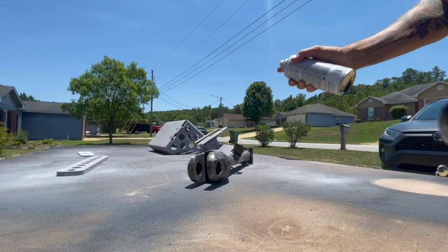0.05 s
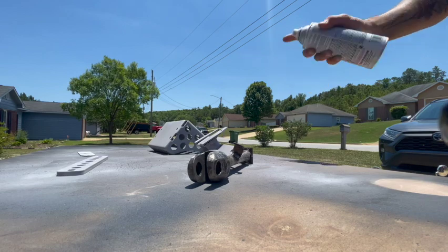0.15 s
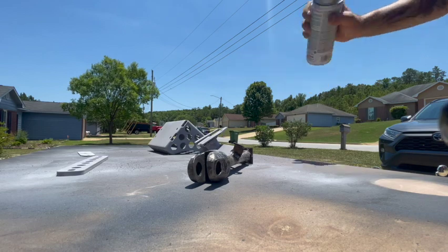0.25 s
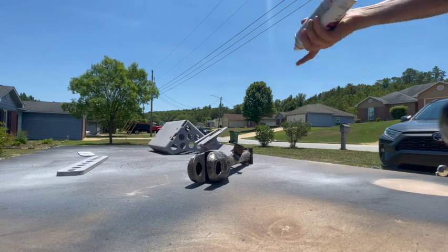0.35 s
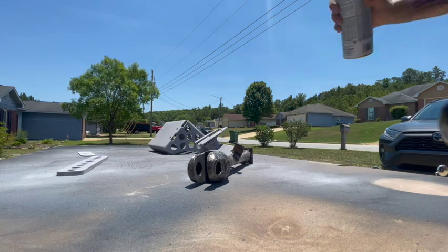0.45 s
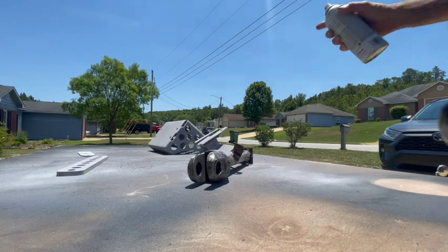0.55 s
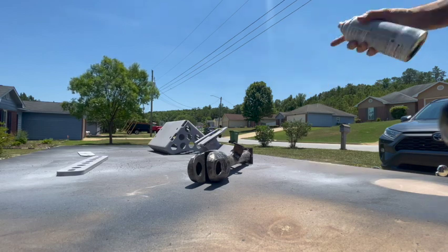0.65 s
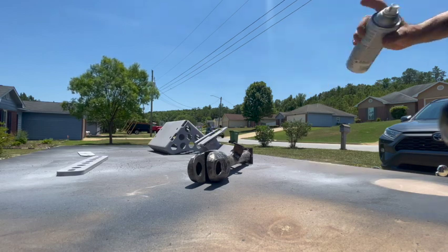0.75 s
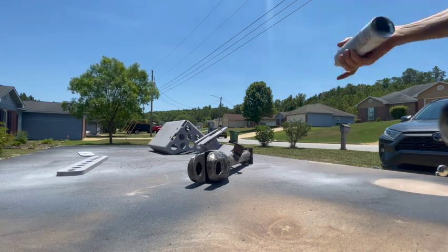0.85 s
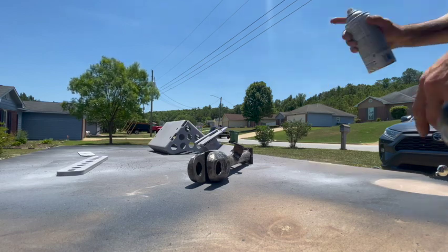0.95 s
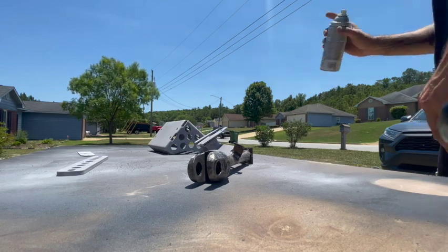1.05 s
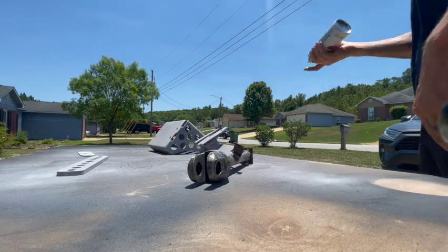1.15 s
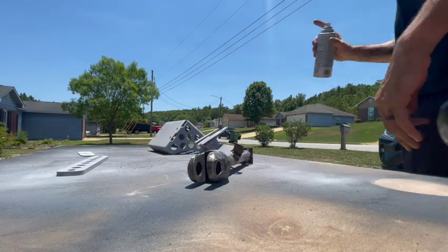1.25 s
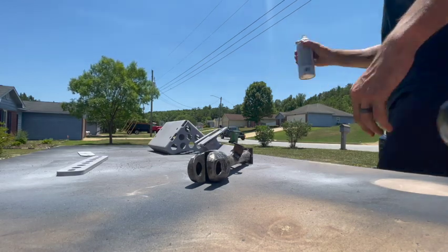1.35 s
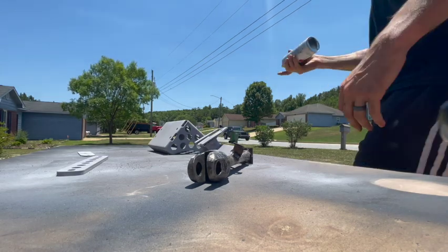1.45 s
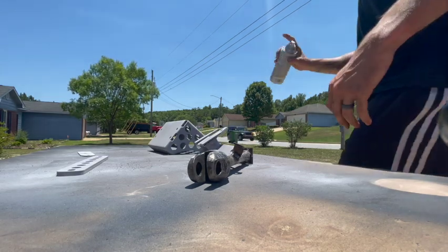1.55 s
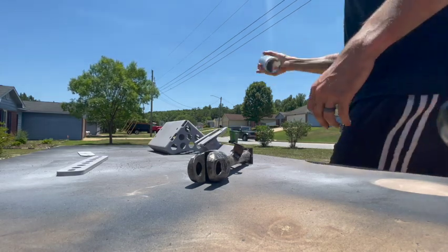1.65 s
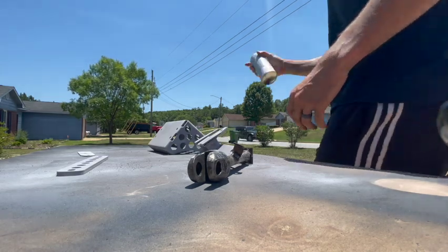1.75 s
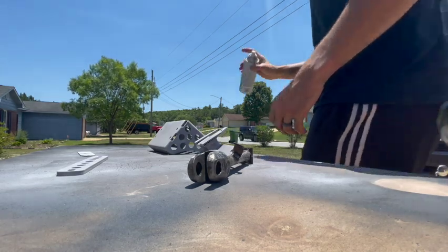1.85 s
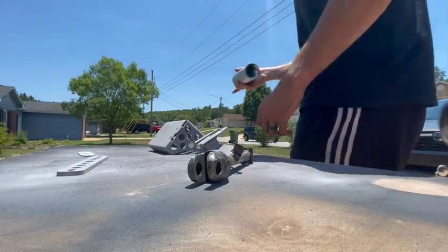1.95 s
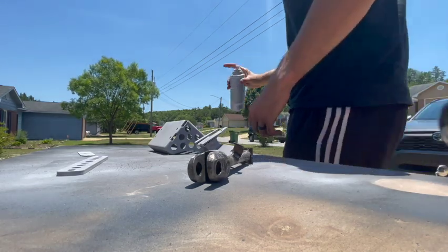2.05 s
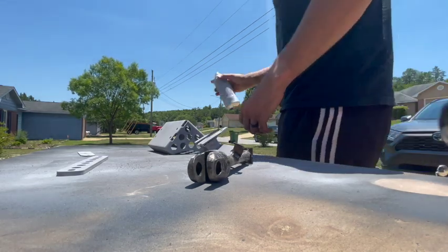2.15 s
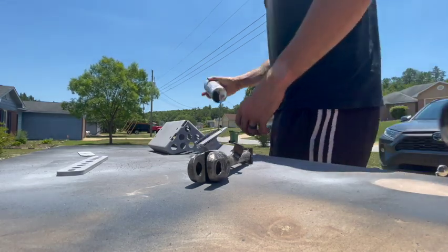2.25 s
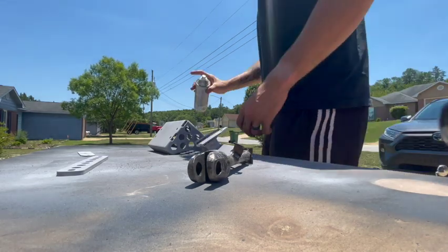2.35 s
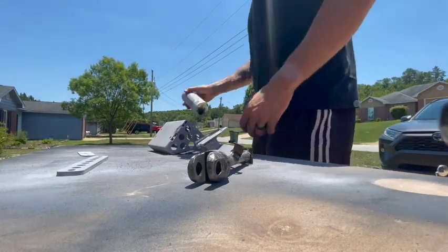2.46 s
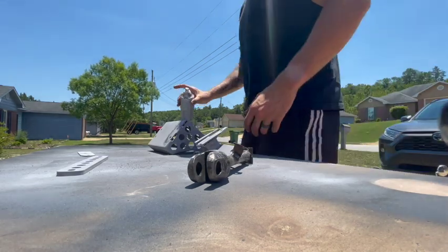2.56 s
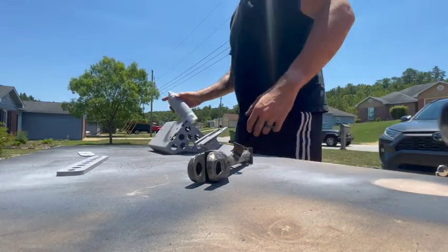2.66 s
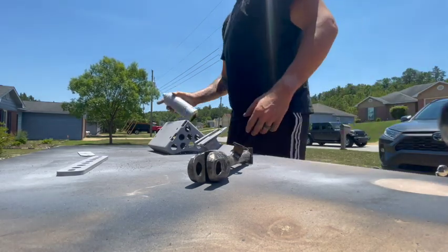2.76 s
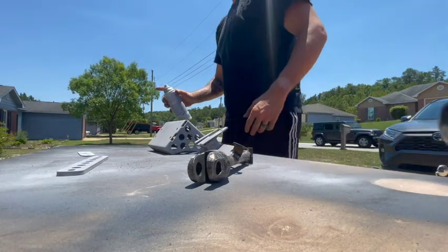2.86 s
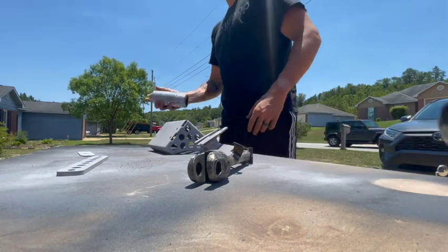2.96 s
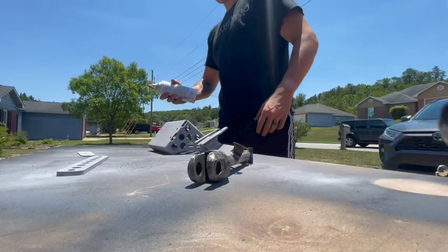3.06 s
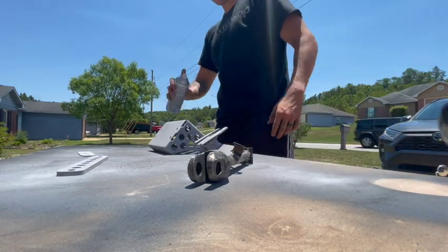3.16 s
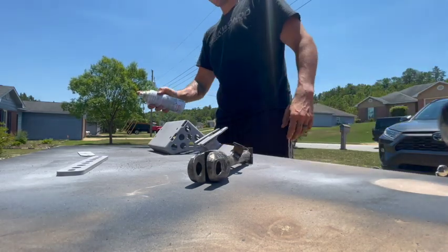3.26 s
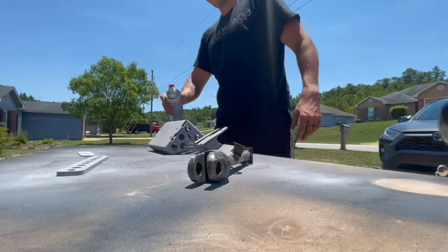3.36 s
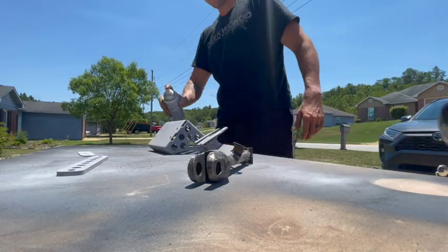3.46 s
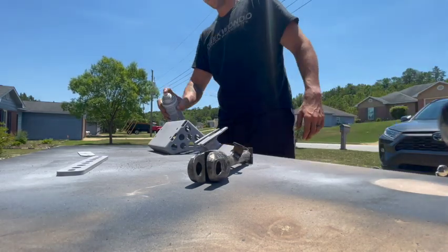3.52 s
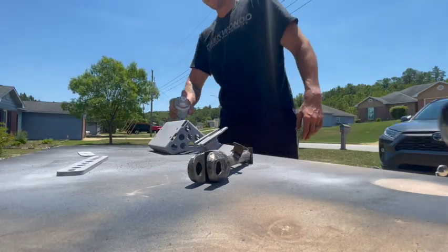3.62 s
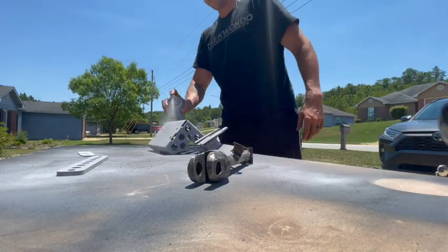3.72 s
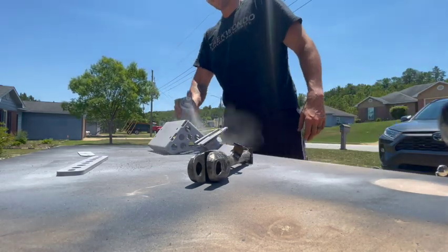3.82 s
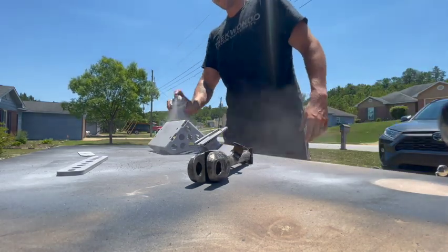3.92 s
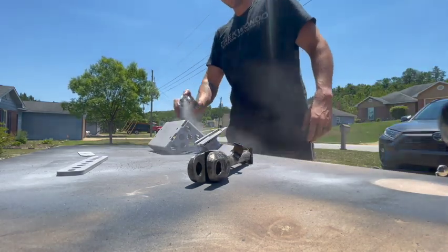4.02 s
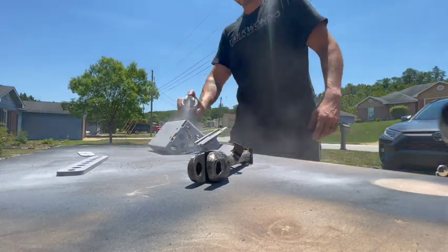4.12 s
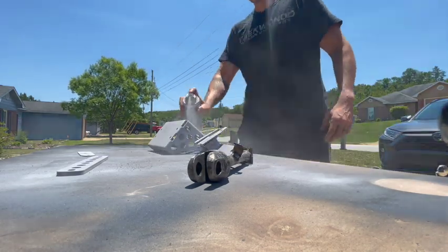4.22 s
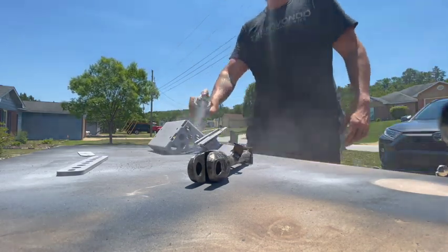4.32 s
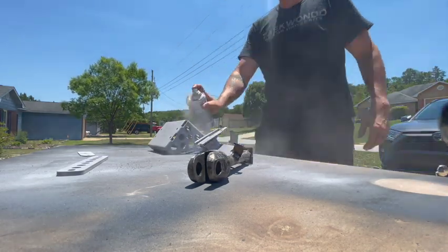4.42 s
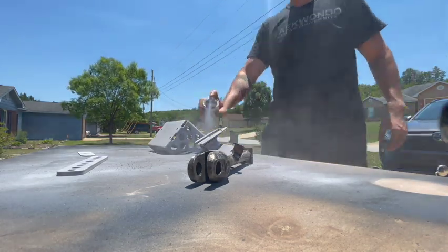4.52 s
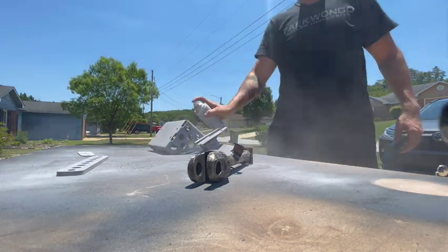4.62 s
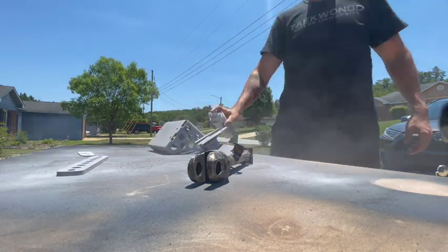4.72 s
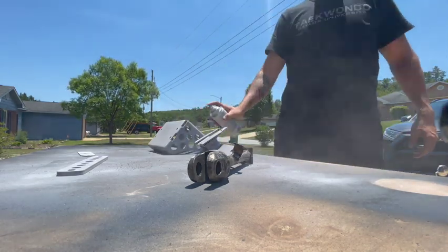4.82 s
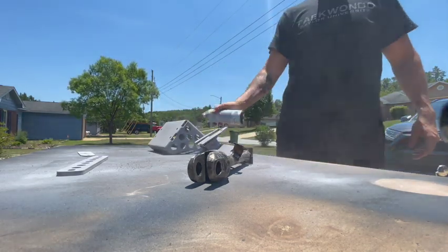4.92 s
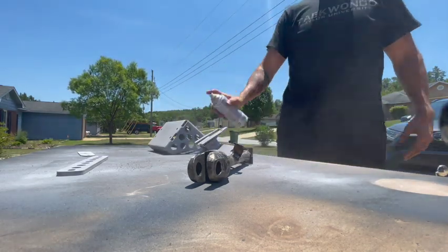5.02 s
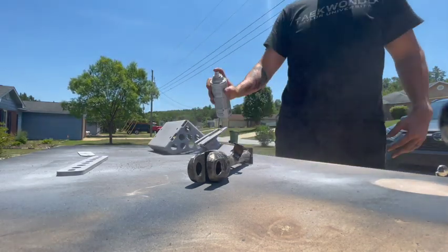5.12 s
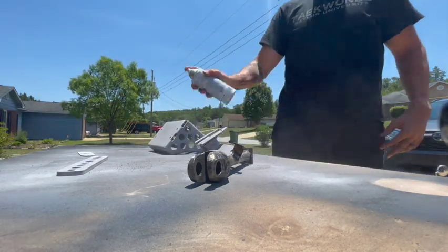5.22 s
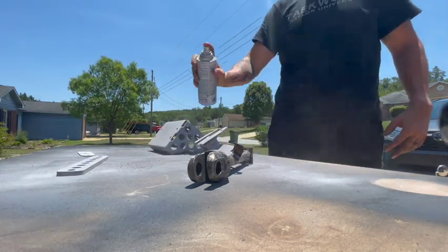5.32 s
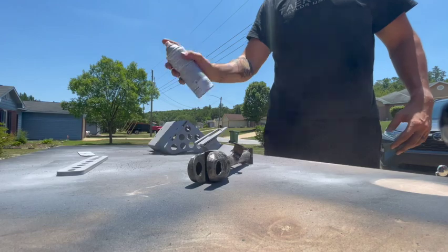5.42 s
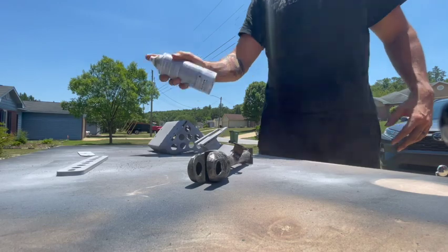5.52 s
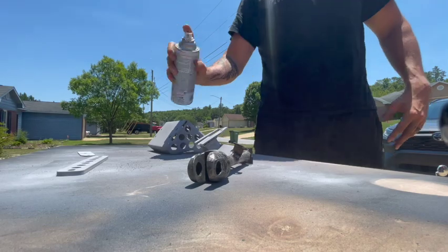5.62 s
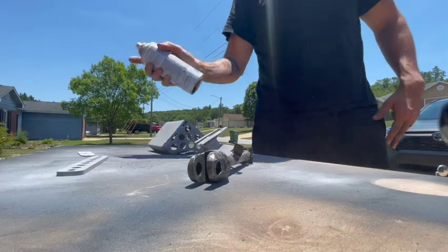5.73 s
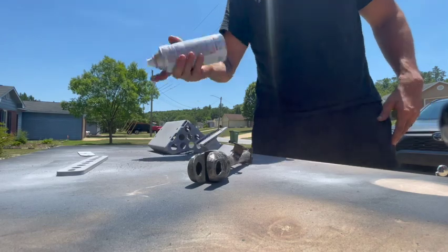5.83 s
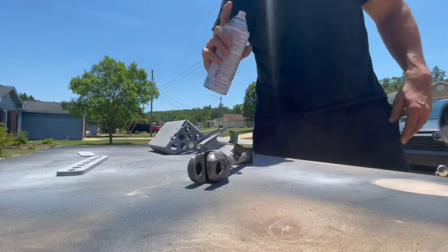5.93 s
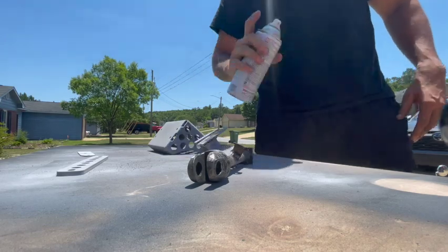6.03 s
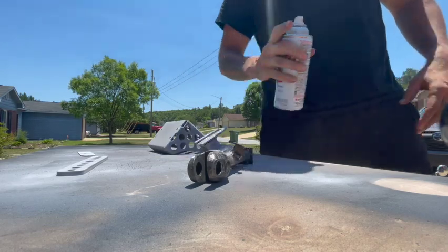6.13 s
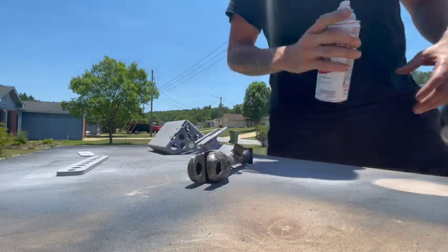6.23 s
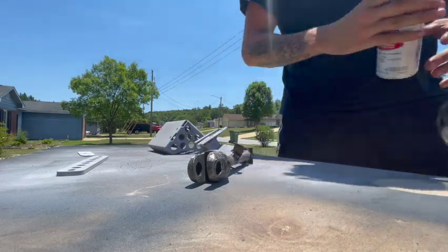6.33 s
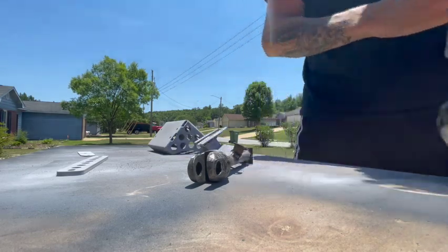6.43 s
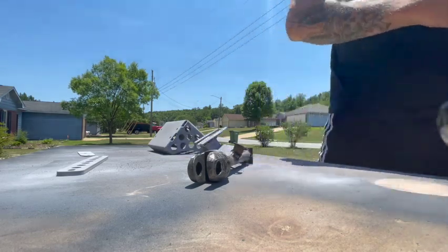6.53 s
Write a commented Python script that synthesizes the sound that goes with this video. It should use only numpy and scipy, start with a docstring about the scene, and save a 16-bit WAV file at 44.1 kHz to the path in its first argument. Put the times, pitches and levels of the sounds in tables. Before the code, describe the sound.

A paint can is shaken close by in an open yard, its ball clacking in fast, irregular metallic clicks that thin out and soften over three seconds. A bright, whistling aerosol hiss bursts for just under a second, then a few faint ticks lead to renewed rattling. A car rumbles past behind and slows, with gentle wind buffeting the stereo microphone.

```python
"""First you hear a ball clacking inside a shaken spray can: noise bursts and dying tones for steel.
The valve then opens for one hissing burst of coloured noise, and the ball clacks again afterwards.
Behind it a car passes and slows down: exhaust and tyre noise plus a sinking engine tone, over far hiss.
A light breeze, made of low noise in gusts, buffets two microphone ports near the can.
The ground, the table and nearby house walls send back short echoes."""
import sys
import numpy as np
from scipy import signal
from scipy.fft import rfft, irfft, next_fast_len
from scipy.io import wavfile
from scipy.ndimage import uniform_filter1d, map_coordinates

SR = 44100
rng = np.random.default_rng(int(sys.argv[2]) if len(sys.argv) > 2 else 0)


def master_out(mix):
    """Clip the mix to full scale and print it as 16-bit PCM to the path in sys.argv[1]."""
    frames = np.transpose(np.atleast_2d(mix))
    ceiling = np.clip(frames, -1, 1)
    pcm = np.round(ceiling * 32767).astype(np.int16)
    wavfile.write(sys.argv[1], SR, pcm)


N = 290178

# Far hiss of the open air: (time [s], level [dB])
AIR_LEVEL = [(0, -48), (.9, -50), (2.5, -50), (3.5, -54.5), (4.3, -55.5), (4.75, -63.5), (6.0, -63.5),
             (6.58, -63)]
# Colours of the street sounds and the wind, relative levels: (frequency [Hz], level per Hz [dB])
EXHAUST_COLOUR = [(50, -27), (100, -4), (170, 0), (250, 0), (320, -7.5), (450, -16), (900, -73.5)]
TYRE_COLOUR = [(200, -6), (370, 3.5), (550, 0.5), (800, 2), (1100, -6.5), (1600, -32.5), (3500, -84)]
FAR_HISS_COLOUR = [(500, 0), (1200, 10), (2800, 5), (4500, -2), (7000, -3), (8500, -19.5), (10500, -8.5),
                   (11800, -19.5), (13000, -56)]
WIND_COLOUR = [(20, -35), (32, -10), (45, -2.5), (70, 11), (110, 2.5), (200, -21), (400, -24.5),
               (1000, -64.5)]
# Parts of the engine tone, relative levels: (multiple of the firing rate [1], level [dB])
ENGINE_PARTS = [(1, -1), (2, -15), (3, -12), (5, -14.5)]
# Gusts of wind: (time [s], level [dB], length [s])
WIND_GUSTS = [(0.34, -39.5, 0.13), (0.604, -51.5, 0.17), (1.254, -35.5, 0.033), (1.7, -45, 0.57),
              (3.408, -35, 0.5), (5.2, -43, 0.85), (6.503, -43, 0.13)]
# Colour of the spray jet, relative: (frequency [Hz], level per Hz [dB])
JET_COLOUR = [(400, -19), (1100, -15.5), (2900, -13), (3300, -21), (5500, -15.5), (6800, -12), (7600, -10),
              (8500, -17.5), (9400, -10.5), (10250, 6), (10900, 1.5), (12000, -12.5), (13600, -17.5),
              (15500, -23)]
# How far the left port leads for the jet: (frequency [Hz], lead [radians])
JET_LEAD = [(3000, -7), (3400, -2), (4800, 3), (5500, 5.5), (7000, 9.5), (8000, 10.5), (9650, 9),
            (12000, 12.5), (13800, 13.5), (15500, 17)]
# The jet's opposite-sign part at the two ports, against the shared part: (frequency [Hz], level [dB])
JET_WIDTH = [(2800, -36), (3300, -3), (5500, -8), (7000, -4), (13000, -33), (14500, -3.5)]
# Ball strikes, and one knock as the valve is pressed:
# (time [s], strength over STRIKE_S [dB], treble over wall ring [dB],
#  tick over clack [dB], wall ring [Hz], clack [Hz])
STRIKES_AND_KNOCK = [(0.013, -35, 4, 0, 1700, 6500), (0.021, -18.5, 7.5, 2, 2710, 7500),
                     (0.044, -24.5, 4, 2, 1640, 6800), (0.111, -15.5, 7, 1.5, 1940, 7600),
                     (0.1222, -25, -1.5, 11, 2310, 4700), (0.1663, -21, 7.5, 0, 1390, 6650),
                     (0.2372, -23.5, -5.5, -3, 2270, 7900), (0.2528, -33.5, -8, -2, 2300, 6500),
                     (0.2622, -33.5, 0, -1, 1840, 5620), (0.2878, -23.5, 5.5, -3.5, 2420, 7540),
                     (0.3028, -30.5, 5, -8, 1650, 5600), (0.3271, -19, -3, -2, 1124, 4560),
                     (0.3785, -19, 8, 1, 1420, 7200), (0.3831, -27, 1, -3, 2100, 4720),
                     (0.4153, -28, -1, 5, 2030, 6460), (0.422, -26, 12, 12, 2580, 7060),
                     (0.434, -21.5, 7.5, -1, 1350, 6850), (0.4511, -24, 11, 5, 2410, 6500),
                     (0.459, -30, 0, -3, 2260, 6520), (0.4867, -32.5, -2, 2, 2150, 5430),
                     (0.54, -24.5, 4, -2, 1050, 7700), (0.5734, -19, -7, -5, 2020, 4910),
                     (0.5848, -24.5, -3, -1, 1870, 4220), (0.5946, -33, 2.5, 4, 1060, 6120),
                     (0.6086, -33.5, -12, -4, 1920, 4570), (0.624, -17, 1.5, -2, 2220, 7300),
                     (0.6527, -22.5, 6.5, -1, 2030, 8100), (0.7152, -27.5, -5.5, 5, 2210, 4460),
                     (0.769, -29, -4, 2, 935, 6950), (0.7792, -32, 0.5, 12, 2240, 6160),
                     (0.8963, -26, -0.5, 5, 2090, 4940), (0.9057, -26, 3.5, 0, 2080, 5630),
                     (0.9283, -31.5, -3.5, 0, 1820, 6030), (0.95, -28.5, 9.5, 4, 970, 8100),
                     (0.9584, -19.5, 13.5, 4, 1250, 2700), (0.9789, -32, 0, -4, 2150, 7900),
                     (0.988, -35.5, -3, -1, 1920, 4500), (0.997, -36.5, -4.5, -6, 1900, 4400),
                     (1.1112, -17, 15, -11, 2060, 4730), (1.162, -36.5, 3, -2, 2190, 4660),
                     (1.2223, -16, 16, -9.5, 1250, 5750), (1.2484, -17.5, 16.5, 12, 1250, 3140),
                     (1.275, -34, 8.5, -2, 2220, 3400), (1.344, -18, 17, -6, 1730, 6850),
                     (1.3711, -20, 9.5, 1.5, 1900, 3460), (1.3835, -21.5, 13.5, -3, 2450, 7940),
                     (1.392, -25.5, 5.5, -7, 2070, 3040), (1.4571, -26.5, 4.5, -25, 1830, 3320),
                     (1.482, -21.5, 10, -8, 1790, 3600), (1.496, -30.5, 11, -6, 2330, 3460),
                     (1.526, -36, 6.5, -3, 2280, 5000), (1.539, -39, 1, -1, 2120, 5440),
                     (1.6, -31, -2.5, 9, 2270, 6500), (1.743, -22, -3.5, 4, 1140, 5100),
                     (1.7719, -31, -0.5, -10, 1740, 3800), (1.8009, -24, 4.5, 0, 1590, 3060),
                     (1.8118, -28.5, -5, 6, 1930, 3790), (1.8514, -28, -10.5, 0, 1670, 3850),
                     (1.872, -21.5, 5, 6, 1320, 5360), (1.9404, -28, -4, -1, 1817, 4200),
                     (1.9847, -28, -4.5, 10, 1150, 3960), (2.014, -21.5, 0, -15, 1850, 2960),
                     (2.0697, -24, -5.5, -4, 1760, 2950), (2.104, -26.5, -5, -4, 1390, 3220),
                     (2.155, -29, 6.5, -9, 2390, 5960), (2.209, -27, -11.5, 7, 2000, 8050),
                     (2.267, -21, -7, -4.5, 1580, 3200), (2.2762, -29.5, -10, -13, 1360, 3450),
                     (2.2877, -32.5, -11.5, 3, 1270, 5790), (2.3298, -29.5, -7, 3, 1090, 4010),
                     (2.3885, -23.5, 1, -0.5, 2020, 5200), (2.4503, -30, -7, -1, 1650, 4200),
                     (2.553, -22.5, -4, -11, 1420, 3050), (2.6699, -25, 0, -10.5, 1430, 6100),
                     (2.79, -30, 5.5, -18, 1060, 2850), (2.804, -29, -8.5, -8, 1043, 6300),
                     (2.8938, -36.5, 1, -6, 1010, 3340), (3.0104, -34.5, -15.5, -7, 1282, 7620),
                     (3.0842, -30.5, -11, -1, 1230, 4410), (3.1627, -28.5, 2, -10.5, 2260, 2900),
                     (3.332, -33, -7, -9, 1630, 4240), (3.418, -31.5, 0.5, -22, 1610, 2960),
                     (3.4492, -33.5, -8, -10, 1230, 6270), (3.6257, -32, -2.5, -2, 1400, 3100),
                     (4.6609, -34, 3.5, -12, 2240, 3080), (4.702, -42.5, 5, -10, 1370, 3160),
                     (4.9145, -42.5, 2, -9, 1980, 3500), (5.0192, -28, -1.5, -14, 1710, 3800),
                     (5.038, -35.5, -0.5, -6, 2360, 6120), (5.0578, -43.5, 2.5, -15, 1290, 3170),
                     (5.0905, -46, -7, -12, 1140, 3360), (5.1262, -50.5, 12, -18, 1160, 3220),
                     (5.2551, -28.5, 0, 7.5, 1730, 7950), (5.2994, -20.5, 5.5, 7.5, 1940, 5470),
                     (5.3497, -34, -10.5, -3, 1503, 7450), (5.4134, -34, -7, 1, 2000, 6200),
                     (5.4857, -34.5, -11.5, 0, 1530, 7580), (5.568, -32, -6.5, 4, 1740, 4130),
                     (5.6335, -22.5, -3, -3, 2200, 6400), (5.707, -27.5, -8.5, 3, 1690, 7800),
                     (5.786, -31.5, -5.5, -4.5, 1210, 6900), (5.9006, -21, -6.5, -2, 2135, 8260),
                     (5.9448, -24, 5.5, -2, 2770, 6550), (5.9802, -21.5, -11, -7, 1270, 6500),
                     (6.0807, -29.5, -5, 0, 1280, 6640), (6.0902, -26, 3, -4.5, 2600, 3270),
                     (6.151, -37.5, -12.5, -10, 1020, 6290), (6.1936, -24.5, -0.5, -9, 1105, 7860),
                     (6.2494, -38.5, -2, -14, 1130, 2890), (6.4848, -34, -2.5, -9, 1930, 7840),
                     (6.5632, -35, 0, 1, 2000, 7100)]
# Colours of the parts of a strike, relative: (frequency [Hz], level per Hz [dB])
THUMP_COLOUR = [(200, -27.5), (650, 1.5), (1300, -23)]
CLACK_COLOUR = [(1500, -37.5), (2400, -0.5), (2900, 8), (3600, 0), (4300, -2), (5200, -3), (6800, 3),
                (8000, -5.5), (10500, -55)]
TICK_COLOUR = [(6000, -26), (7800, -0.5), (9000, -1), (10400, 8.5), (11300, -2), (12200, -14.5),
               (13200, -29), (16000, -49)]
# The ball rolling along the wall: (start [s], end [s], strength of a bump [dB], grit over ring [dB])
BALL_ROLLS = [(0.055, 0.085, -34, -3.5), (0.388, 0.46, -42.5, -6), (1.352, 1.408, -40, 6),
              (4.928, 4.997, -44, -11)]
# Colour of the rolling grit, relative: (frequency [Hz], level per Hz [dB])
GRIT_COLOUR = [(1800, -10), (3000, -0.5), (4500, 4), (10800, -1), (13500, -53)]
# Lowest ringing modes of the wall, relative levels: (frequency [Hz], level [dB])
SHELL_MODES = [(1100, 0), (1560, -0.5), (2120, -2), (2620, -6.5)]
# After-ring of the whole can, relative levels: (frequency [Hz], level [dB], time to fall 60 dB [s])
BODY_MODES = [(1420, 4, 0.054), (2340, 4, 0.085), (2956, 6.5, 0.13), (3450, -2, 0.13), (4030, -0.5, 0.079),
              (5630, -3, 0.12), (6400, -12.5, 0.34)]
# How far the left port leads, can close by and across the table: (frequency [Hz], lead [radians])
CLOSE_LEAD = [(1700, 0.47), (2300, -1.8), (4400, -2.5), (5300, 0.5), (6500, 1.48), (8000, 2.5), (9300, 1),
              (10000, 3.5), (12500, 6.5)]
FAR_LEAD = [(2200, 0.11), (3000, 0), (4300, 1.7), (5200, 4), (6500, 7.5), (8000, 9.5), (9300, 7),
            (10000, 9.5), (12500, 13.5)]

# The car: (time when nearest [s], time from there until 3 dB down [s], level when nearest [dB])
EXHAUST_PASS = (2.16, 0.94, -39.5)
TYRE_PASS = (3.34, 1.0, -42.5)
BRAKE_S, BRAKE_LENGTH_S = 4.05, 0.78
BRAKE_DB, THROTTLE_DB = 10.5, 5.5  # loss of tyre noise and of upper exhaust rumble as the car slows
TAILPIPE_DB = 3.5  # gained behind the car, lost in front of it
# The engine tone swells, holds and fades while its pitch sinks
FIRING_HZ, SAG_HZ_PER_S = 48.6, 3.4  # the pitch is given at the top of the swell
SWELL_S, HOLD_S = 3.75, 1.24  # top of the swell, then length of the hold
FIRING_DB, SWELL_DB_PER_S, FADE_DB_PER_S = -38.5, 13.5, 8
BREEZE_DB = -58  # steady part of the wind
HOUSE_S, HOUSE_DB = .052, -4  # delay of the house wall, and its peak against the tail
# The valve spurts half open, then fully
OPEN_S, FULL_S, CLOSE_S = 3.602, 3.685, 4.497
ATTACK_S, RELEASE_S = 0.022, 0.011
JET_DB, HALF_OPEN_DB = -28, 4  # full flow, and the loss while half open
HISS_START_DB, HISS_SAG_DB_PER_S = 1.5, 4.5  # gain of the broad hiss under the whistle
STRIKE_S = .005  # strike levels are averaged over this time
WALL_T60_S, WALL_SOFT_GROWS, WALL_RISE_S = 0.0093, .25, 0.00075  # soft blows ring longer
MAIN_MODE_DB = 6.5  # the mode under the ball stands out
ROLL_HZ, BUMPS_PER_S = 1850, 97  # wall note and bump rate, both varied from bump to bump
ECHO_S, ECHO_SMEAR_S, ECHO_SCATTER = 0.016, 0.0037, 0.202  # typical delay, smear, spread of delays
ECHO_LOW_DB, ECHO_HIGH_DB = -18, -19
BODY_DB, SYMPATHY_DB, SYMPATHY_OCTAVES = -23.5, 6, 0.51  # body rings most near the clack's pitch
FAR_FROM_S, FAR_TO_S = 1.65, 5.85  # the can is across the table
TOP_HZ = 15800


def amp(db):
    """Turn decibels into a gain."""
    return 10 ** (np.asarray(db) / 20)


def unit(x):
    """Scale a sound to an average (rms) level of 1."""
    return x / np.sqrt(np.mean(x ** 2) + 1e-20)


def along(points, hz):
    """Read a curve of (frequency, value) points, spaced as the ear hears pitch."""
    f, v = np.transpose(points)
    return np.interp(np.log(hz + 1), np.log(f + 1), v)


def curves(rows):
    """Draw one value per sample for each column after the time."""
    s, *columns = np.transpose(rows)
    return [np.interp(np.arange(N) / SR, s, column) for column in columns]


def wobble(rate):
    """Draw a smooth random curve with this many random points a second."""
    points = rng.standard_normal(int(N * rate / SR) + 4)
    return map_coordinates(points, [np.arange(N) * rate / SR])


def filtered(x, response):
    """Change the strength and phase of each frequency by a given response."""
    m = next_fast_len(N + SR // 2)
    return irfft(rfft(x, m) * response(np.fft.rfftfreq(m, 1 / SR)), m)[..., :N]


def causal(gain):
    """Give a gain curve the phase that makes it act as promptly as possible (minimum phase)."""
    cepstrum = irfft(np.log(np.maximum(gain, 1e-6)))
    half = cepstrum.shape[-1] // 2
    fold = np.r_[1, np.full(half - 1, 2), 1, np.zeros(half - 1)]
    return np.exp(rfft(cepstrum * fold))


def rush(colour, side_db):
    """Make steady stereo noise; side_db sets the part with opposite sign at the two ports."""
    noise = rng.standard_normal((2, N))
    mid, side = filtered(noise, lambda hz: amp(along(colour, hz))) * amp([[0], [side_db]])
    return unit(np.array([mid + side, mid - side]))


def ports(x, lead):
    """Shift the phase between the two ports by an amount that depends on frequency."""
    return filtered(x, lambda hz: np.exp(.5j * along(lead, hz) * np.array([[1], [-1]])))


def placed(times, sounds, db):
    """Lay short stereo sounds on the time line at their levels."""
    out = np.zeros((2, N + SR))
    for s, sound, gain in zip(times, sounds, amp(db)):
        start = max(round(s * SR), 0)
        out[:, start:][:, :sound.shape[-1]] += gain * sound
    return out[:, :N]


def split(db, ratio_db):
    """Share a level between two parts, the second ratio_db above the first."""
    first = db - 10 * np.log10(1 + amp(ratio_db) ** 2)
    return first, first + ratio_db


def one_strike(x):
    """Scale each short stereo sound to the energy of one strike at 0 dB."""
    return x / np.sqrt(np.sum(x ** 2, axis=(1, 2), keepdims=True) / (2 * STRIKE_S * SR))


def passing(nearest_s, span_s, db):
    """Give the level of something driving past in a straight line: distance makes it fainter."""
    return db - 10 * np.log10(1 + ((np.arange(N) / SR - nearest_s) / span_s) ** 2)


def exhaust_rumble(braked):
    """Exhaust noise is louder from behind the car; its upper rumble drops as the car slows."""
    behind = np.tanh(np.arange(N) / SR - EXHAUST_PASS[0])
    level_db = passing(*EXHAUST_PASS) + TAILPIPE_DB * behind + wobble(14)
    exhaust = amp(level_db) * rush(EXHAUST_COLOUR, side_db=-15.5)
    upper = filtered(exhaust, lambda hz: 1 - 1 / (1 + (hz / 200) ** 4))
    return exhaust - upper + amp(-THROTTLE_DB * braked) * upper


def tyre_roar(braked):
    """Tyres make a broad roar that weakens with distance and as the car slows."""
    level_db = passing(*TYRE_PASS) - BRAKE_DB * braked + wobble(6.5)
    return amp(level_db) * rush(TYRE_COLOUR, side_db=-6.5)


def engine_tone():
    """Regular firing makes a low tone with overtones, sinking in pitch as the engine winds down."""
    age = np.arange(N) / SR - SWELL_S
    swell_db = SWELL_DB_PER_S * np.maximum(-age, 0)
    fade_db = FADE_DB_PER_S * np.maximum(age - HOLD_S, 0)
    turn = 2 * np.pi * np.cumsum(FIRING_HZ - SAG_HZ_PER_S * age) / SR
    tone = sum(amp(db + wobble(9.8)) * np.sin(round(k) * (turn + 0.29 * wobble(5)))
               for k, db in ENGINE_PARTS)
    return amp(FIRING_DB - swell_db - fade_db) * np.sqrt(2) * tone


def street():
    """A passing car adds rumble, roar and tone to the far hiss of the open air."""
    braked = np.clip((np.arange(N) / SR - BRAKE_S) / BRAKE_LENGTH_S, 0, 1)
    car_noise = (exhaust_rumble(braked) + tyre_roar(braked)) * amp([[.8], [-.8]])
    air_db, = curves(AIR_LEVEL)
    far_hiss = amp(air_db + .5 * wobble(8.2)) * rush(FAR_HISS_COLOUR, side_db=-4.5)
    return car_noise + engine_tone() + far_hiss


def breeze():
    """Gusts swell and die away over a faint steady wind; their lumps push on each port separately."""
    t = np.arange(N) / SR
    gusts = sum(amp(db) ** 2 * np.exp(-((t - s) / length) ** 2) for s, db, length in WIND_GUSTS)
    power = amp(BREEZE_DB) ** 2 + gusts
    lumps = amp(2.05 * np.array([wobble(7.9), wobble(10)]))
    return np.sqrt(power) * unit(lumps * rush(WIND_COLOUR, side_db=3.0))


def yard(x, t60, size=16384):
    """Table and house fronts scatter a thin tail; the nearest wall answers a little later."""
    t = np.arange(size) / SR
    house = amp(HOUSE_DB) * np.exp(-((t - HOUSE_S) / .005) ** 2)
    fading = amp(-60 * t / t60) * (1 - np.exp(-t / 0.0024))
    tail = rng.standard_normal((2, size)) * (fading + house)
    return signal.fftconvolve(x, tail / np.linalg.norm(tail[0]), axes=1)[:, :N]


def spray():
    """A rough jet of gas whistles at the nozzle; its broad hiss thins as the can moves over the table."""
    t = np.arange(N) / SR
    age = np.maximum(t - OPEN_S, 0)
    valve = np.minimum(age / ATTACK_S, 1) * np.exp(-np.maximum(t - CLOSE_S, 0) / RELEASE_S)
    flow_db = JET_DB - HALF_OPEN_DB * np.clip((FULL_S - t) / RELEASE_S, 0, 1)

    def mid_side_gain(hz):
        side = amp(along(JET_WIDTH, hz))
        return amp(along(JET_COLOUR, hz)) * [np.ones_like(hz), side] / np.hypot(1, side)

    mid, side = filtered(rng.standard_normal((2, N)), mid_side_gain)
    jet = ports(unit(np.array([mid + side, mid - side])), JET_LEAD)
    broad = filtered(jet, lambda hz: hz < 8600)
    low = filtered(jet, lambda hz: hz < 4400)
    whistle = jet - broad
    # The two bands of hiss waver separately
    swirl = sum(amp(.9 * wobble(16)) * band for band in (low, broad - low))
    hiss = amp(HISS_START_DB - HISS_SAG_DB_PER_S * age) * swirl
    return valve * amp(flow_db + 1.0 * wobble(45)) * (whistle + hiss)


def bursts(colour, t60, rise, side_db, ring_hz=None, width_hz=1, ring_db=0,
           count=len(STRIKES_AND_KNOCK), size=2048):
    """Each contact is a short noise, coloured by the steel and by that spot's own resonances."""
    t, hz = np.arange(size) / SR, np.fft.rfftfreq(size, 1 / SR)
    stretch = np.exp(.15 * rng.standard_normal((count, 1, 1)))  # glancing blows last longer
    envelope = (1 - np.exp(-(t / (rise * stretch)) ** 2)) * amp(-60 * t / (t60 * stretch))
    noise = rng.standard_normal((count, 3, size)) * envelope
    contact = noise[:, :1] + amp(side_db) * noise[:, 1:]  # shared part plus one part per port
    gain = amp(along(colour, hz))
    if ring_hz is not None:
        main = ring_hz[:, None, None]
        step = rng.choice([-1, 1], main.shape)
        neighbour = main * 1.47 ** step  # the next mode up or down rings too

        def peak(centre):
            return 1 / (1 + (2 * (hz - centre) / width_hz) ** 2)

        gain = gain * np.sqrt(1 + amp(ring_db) ** 2 * (peak(main) + .5 * peak(neighbour)))
    return one_strike(irfft(rfft(contact) * causal(gain)))


def wall_rings(wall_hz, hard_db, size=2048):
    """A blow rings the wall as clean dying tones; the mode nearest to the spot's note leads."""
    t = np.arange(size) / SR
    mode_hz, mode_db = np.transpose(SHELL_MODES)
    detune = np.log(wall_hz[:, None] / mode_hz)
    main = np.abs(detune) == np.abs(detune).min(axis=1, keepdims=True)
    drift, share, turn, pan = np.moveaxis(rng.standard_normal(detune.shape + (4,)), -1, 0)
    # The paint detunes the other modes from spot to spot
    hz = np.where(main, wall_hz[:, None], mode_hz * np.exp(.05 * drift))
    t60 = WALL_T60_S * amp(-WALL_SOFT_GROWS * hard_db)[:, None, None]
    envelope = amp(-60 * t / t60) * (1 - np.exp(-(t / WALL_RISE_S) ** 2))
    tones = np.sin(2 * np.pi * (hz[..., None] * t + turn[..., None])) * envelope
    db = mode_db + MAIN_MODE_DB * main + 2 * share
    return one_strike(amp(np.stack([db + pan, db - pan], axis=1)) @ tones)


def body_rings(clack_hz, width, bloom, size=6144):
    """Close groups of body modes ring on, blooming as the blow spreads round the can."""
    t, hz = np.arange(size) / SR, np.fft.rfftfreq(size, 1 / SR)
    noise = rfft(rng.standard_normal((len(clack_hz), 2, size)))

    def cluster(centre):
        return unit(irfft(noise / (1 + ((hz / centre - 1) / width) ** 2)))

    def share(centre):
        near = np.exp(-(np.log2(centre / clack_hz) / SYMPATHY_OCTAVES) ** 2)
        chance_db = 2 * rng.standard_normal(len(clack_hz))
        return amp(SYMPATHY_DB * near + chance_db)[:, None, None]

    rings = sum(share(centre) * amp(db - 60 * t / t60) * cluster(centre)
                for centre, db, t60 in BODY_MODES)
    return (1 - np.exp(-t / bloom)) * rings


def off_the_ground(sounds):
    """Each short sound comes back smeared from the ground, earlier or later as the can moves."""
    t = np.arange(sounds.shape[-1]) / SR
    delay = ECHO_S * np.exp(ECHO_SCATTER * rng.standard_normal((len(sounds), 1, 1)))
    paths = rng.standard_normal(sounds.shape) * np.exp(-((t - delay) / ECHO_SMEAR_S) ** 2)
    paths = paths / np.linalg.norm(paths, axis=-1, keepdims=True)
    return irfft(rfft(sounds) * rfft(paths))


def from_the_can(x):
    """The ports hear the can from one direction close by, from another across the table."""
    t = np.arange(N) / SR
    away = ((t > FAR_FROM_S) & (t < FAR_TO_S)).astype(float)
    far = uniform_filter1d(away, SR // 20)  # smooth each move
    return ports(far * x, FAR_LEAD) + ports((1 - far) * x, CLOSE_LEAD)


def rolling():
    """The ball skips along the wall in small uneven bumps, each a ring and a little grit."""
    out = np.zeros((2, N))
    for start, end, db, grit_db in BALL_ROLLS:
        count = max(round(abs(end - start) * BUMPS_PER_S) + 1, 2)
        slip, push, bend = rng.standard_normal((count, 3)).T
        times = start + (np.arange(count) + .17 * slip) / BUMPS_PER_S
        ring = wall_rings(ROLL_HZ * np.exp(.1 * bend), np.zeros(count))
        grit = bursts(GRIT_COLOUR, t60=.016, rise=.001, side_db=-10, count=count)
        out += placed(times, ring, db + 2 * push)
        out += placed(times, grit, db + grit_db + 2 * push)
    return out


def can():
    """Each strike is ring, clack, tick and thump with a soft noisy onset, then a body ring."""
    s, db, hard_db, sheen_db, wall_hz, clack_hz = np.transpose(STRIKES_AND_KNOCK)
    wall_db, treble_db = split(db, hard_db)
    clack_db, tick_db = split(treble_db, sheen_db)

    wall = wall_rings(wall_hz, hard_db)
    clack = bursts(CLACK_COLOUR, t60=.0036, rise=.002, side_db=-6,
                   ring_hz=clack_hz, width_hz=900, ring_db=9.5)
    tick_hz = 11100 * np.exp(.045 * rng.standard_normal(len(s)))  # each spot has its own top note
    tick = bursts(TICK_COLOUR, t60=.0035, rise=.002, side_db=-10,
                  ring_hz=tick_hz, width_hz=900, ring_db=7)
    soft_onset = bursts(CLACK_COLOUR, t60=.01, rise=.004, side_db=-7)
    thump = bursts(THUMP_COLOUR, t60=.004, rise=.001, side_db=-14)  # the base flexes

    blows = placed(s, wall, wall_db) + placed(s, clack, clack_db) + placed(s, tick, tick_db)
    blows += placed(s - .002, soft_onset, treble_db - 18)
    blows += placed(s, thump, treble_db - 21.5)  # stronger when the blow has more treble
    echoed = [(wall, wall_db + ECHO_LOW_DB), (clack, clack_db + ECHO_HIGH_DB),
              (tick, tick_db + ECHO_HIGH_DB)]
    echo = sum(placed(s, off_the_ground(part), level) for part, level in echoed)

    # The clack drives the body most
    force = amp(wall_db - 11.0) ** 2 + amp(clack_db) ** 2 + amp(tick_db - 12) ** 2
    body = body_rings(clack_hz, width=.045, bloom=.005)
    after_ring = placed(s, body, 10 * np.log10(force) + BODY_DB)
    return from_the_can(blows + rolling()) + echo + after_ring


def scene():
    """Put the can and its jet in the yard, the street behind and the wind on the microphone."""
    near = can() + spray()
    return near + amp(-27) * yard(near, t60=0.13) + street() + breeze()


def record(dry):
    """Keep only what lies below the upper frequency limit."""
    return filtered(dry, lambda hz: hz < TOP_HZ)


dry = scene()
out = record(dry)
master_out(out)
```